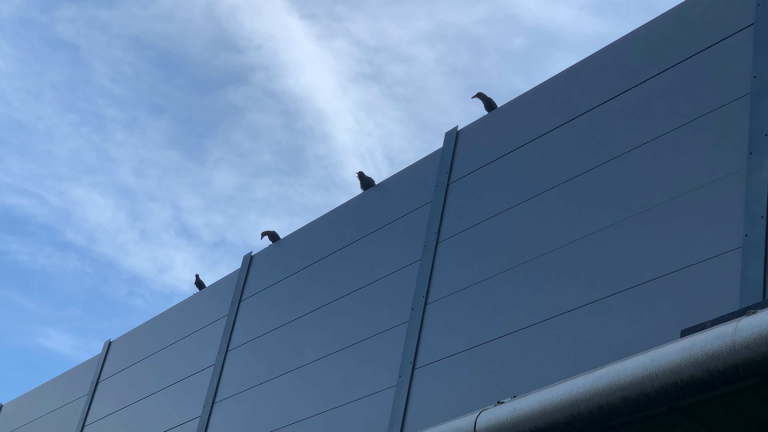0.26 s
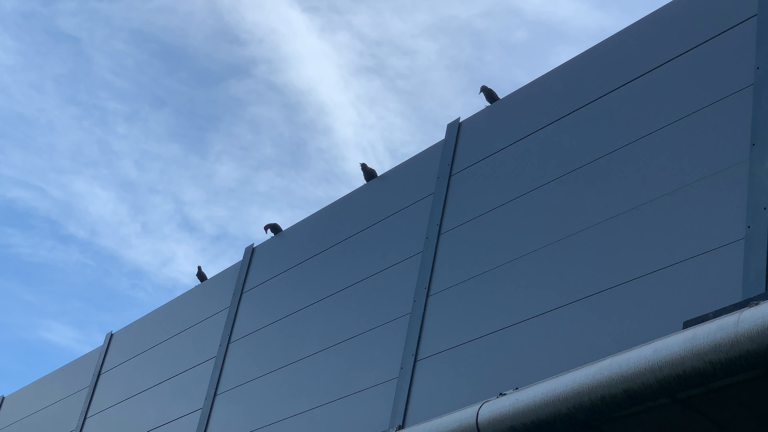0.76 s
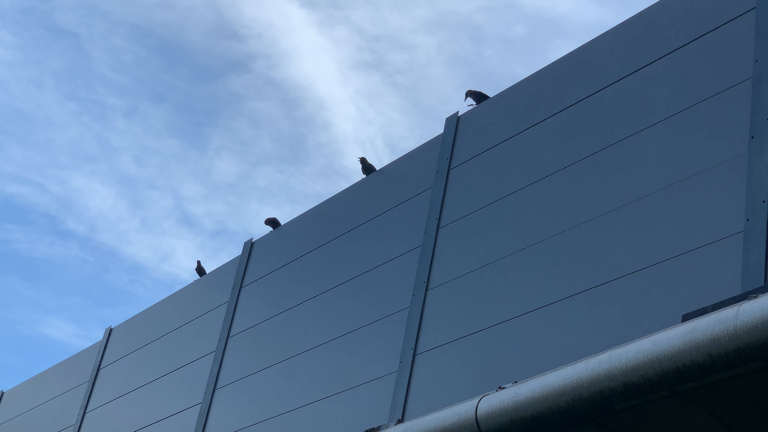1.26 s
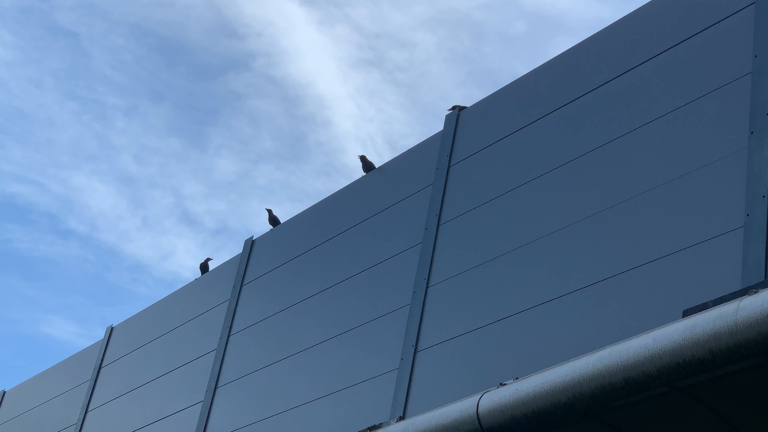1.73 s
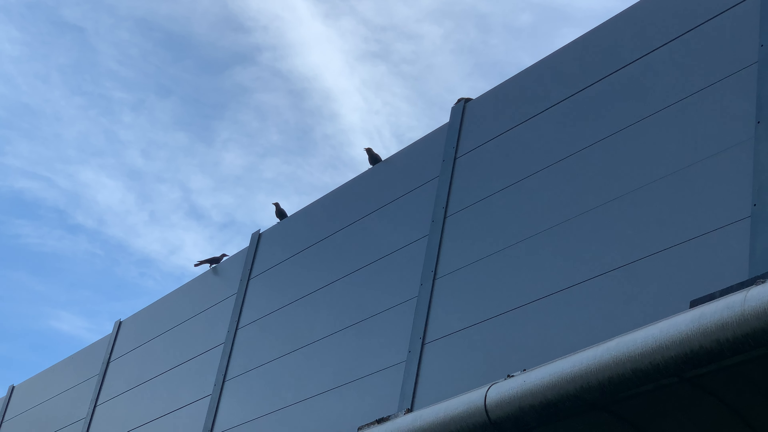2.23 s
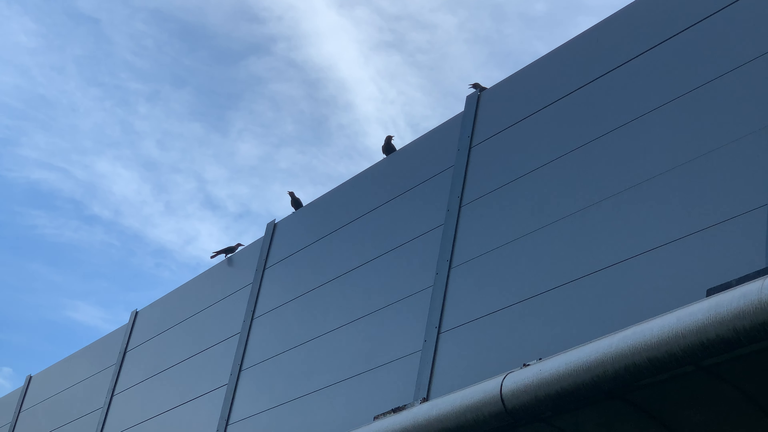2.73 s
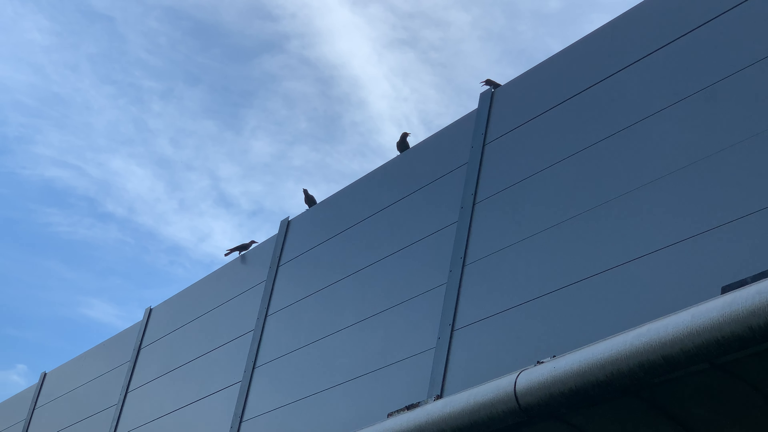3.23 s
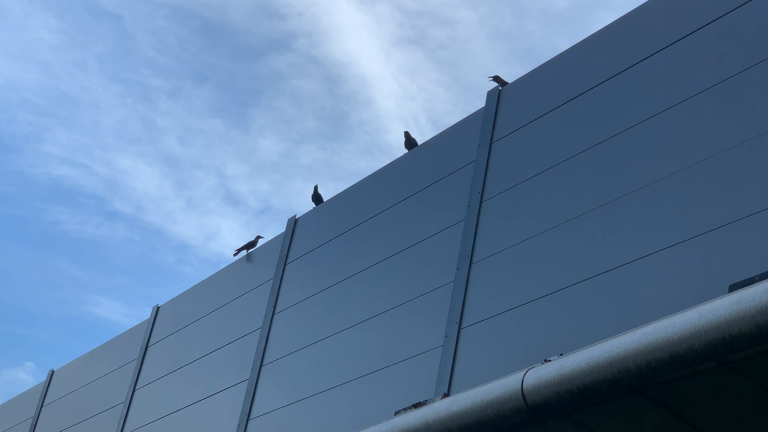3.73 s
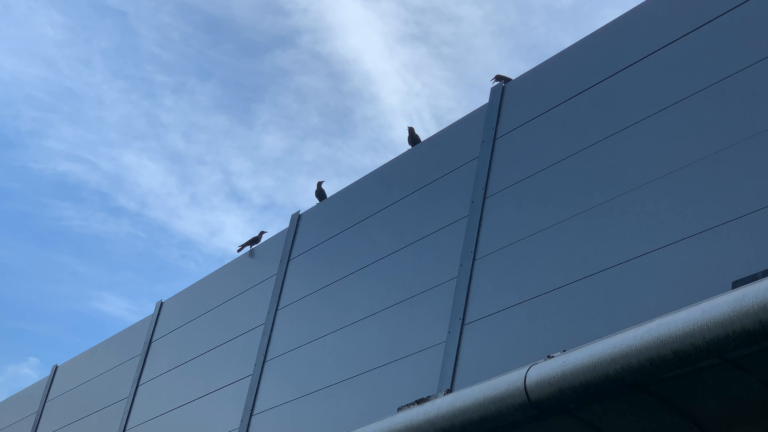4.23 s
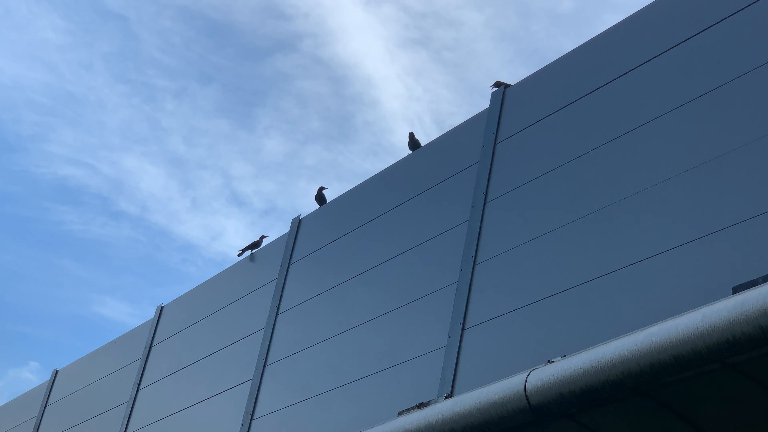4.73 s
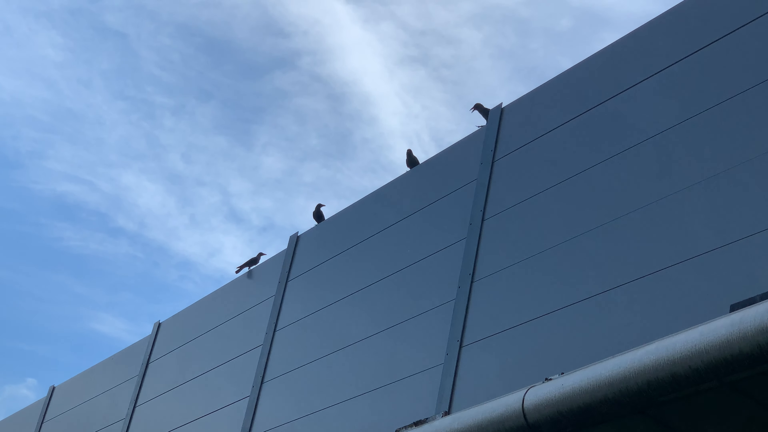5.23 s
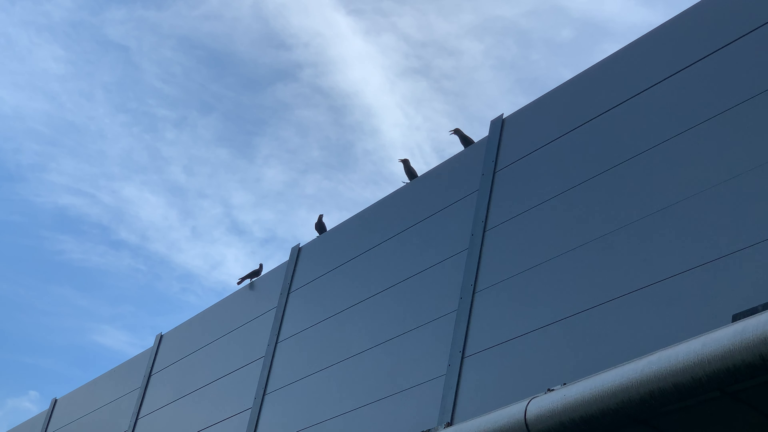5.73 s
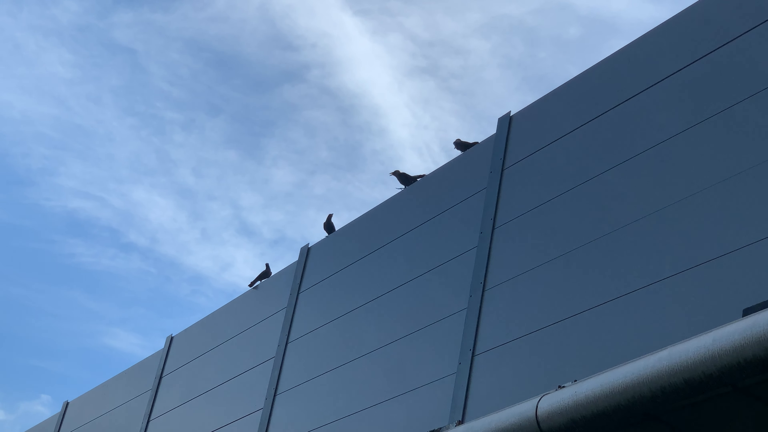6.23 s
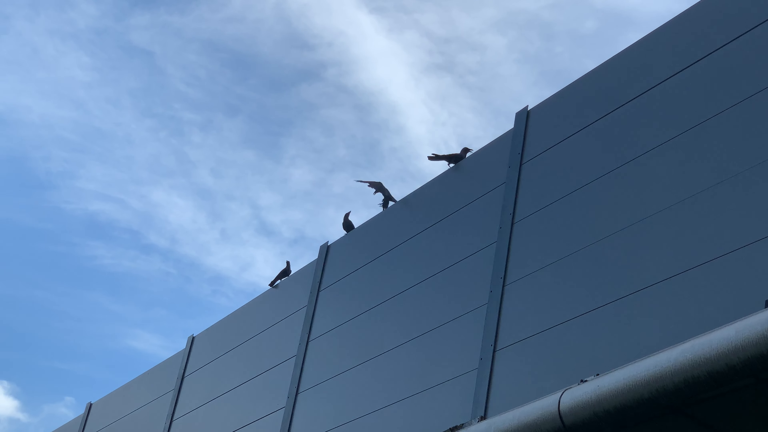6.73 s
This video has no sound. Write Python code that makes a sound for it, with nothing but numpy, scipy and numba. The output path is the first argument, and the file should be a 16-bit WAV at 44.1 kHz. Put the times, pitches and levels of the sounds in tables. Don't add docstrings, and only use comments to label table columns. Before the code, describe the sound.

Outdoors beside an elevated road, crows on a tall metal wall caw hoarsely some metres away. Two spaced calls come first, then a quick run of four alternating weak and loud. After a pause filled with wind buffeting, one more caw and a short faint one follow. Traffic rumble, hum and soft tyre hiss continue underneath, heard through a handheld phone microphone.

```python
import sys
import numpy as np
from scipy import signal
from scipy.fft import rfft, irfft
from scipy.io import wavfile
from scipy.ndimage import uniform_filter1d
from numba import njit

SR = 44100
rng = np.random.default_rng(int(sys.argv[2]) if len(sys.argv) > 2 else 0)


def gain_from_decibels(decibels):
    exponent = np.asarray(decibels, float) / 20
    return 10 ** exponent


def master_out(mix):
    frames = np.transpose(np.atleast_2d(mix))
    ceiling = np.clip(frames, -1, 1)
    pcm = np.round(ceiling * 32767).astype(np.int16)
    wavfile.write(sys.argv[1], SR, pcm)


N = 307377


def unit(x):
    return x / np.sqrt(np.mean(x ** 2) + 1e-18)


def over_hz(table, hz):
    f, v = np.transpose(table)
    return np.interp(np.log(hz + 1), np.log(f + 1), v)


@njit
def svf(x, hz, width):
    y, b, l = np.empty(len(x)), 0., 0.
    for i in range(len(x)):
        g, k = np.tan(np.pi * hz[i] / SR), width / hz[i]
        v = (b + g * (x[i] - l)) / (1 + g * (g + k))
        b, l, y[i] = 2 * v - b, l + 2 * g * v, k * v
    return y


def band(x, hz, width_hz):
    return svf(x, np.zeros(len(x)) + hz, 1. * width_hz)


def walk(rate_hz, size=N):
    k = int(SR / rate_hz)
    steps = np.repeat(rng.standard_normal(size // k + 1), k)
    return 1.299 * uniform_filter1d(uniform_filter1d(steps, k), k)[:size]


def crows():
    # start_s, length_s, level_db, top_flutter_hz, fall_s
    caws = [
        (0.106, .455, -34.5, 86.69, .23),
        (0.949, 0.4407, -36, 85.12, 0.179),
        (2.481, 0.381, -38.5, 79.38, 0.2764),
        (2.718, .39, -30.5, 83.38, 0.17),
        (3.089, .39, -39, 79.1, .26),
        (3.54, .53, -32, 83.65, .3),
        (5.489, 0.401, -35, 85.43, 0.314),
        (6.474, .295, -42.5, 77.53, .17),
    ]
    # open_pipe_hz, valve_db, low_lines_db, rasp_db, top_air_db
    timbres = [(1943.5, -15.5, -12.5, -9, -2), (1915, -2.5, -11.5, -9, -2), (1922, -6.5, -12.5, -12, -2),
               (1917, -22, -18, -15.5, 0), (1909, 1.5, -11.5, -12.5, -2),
               (1898.6, -15.5, -15.5, -12.5, 2.37), (1963.4, -2.5, -15, -15.5, -2),
               (1789, -13.5, -11.5, -13.5, -1)]
    # valve_cycles_per_flutter, second_slap_share, second_slap_turns, rise_s, left_minus_right_db
    voices = [(13, -0.48, .5, 0.12, 1.42), (13, 0.54, .5, 0.14, 1), (13, 0.57, .45, .12, 0.5),
              (13, -0.52, .5, 0.064, 1.5), (13, 0.53, .45, 0.11, 0.37), (13, -0.45, .5, .11, 0.9),
              (12, 0.54, 0.34, .125, -0.1), (12, 0.66, .5, .14, 1.35)]
    roughness = [(1.4, .55), (1.5, .5), (1.7, .75), (1.3, .45), (1.9, .7), (1.7, .4), (1.5, .8), (2.3, .7)]
    # hz, left_lead_rad
    port_lead = [(300, .2), (1100, 0.99), (2000, 0.46), (4400, 1.344), (6300, 2.418), (8500, 1.055),
                 (10000, 1.57), (14000, 1.42)]
    # hz, left_minus_right_db
    crow_lean = [(60, 0.5), (110, -0.5), (200, -0.5), (380, 1.5), (700, -3.5), (1290, -2), (2380, -5.5),
                 (4400, -7), (8120, -2), (15000, 1)]
    direct = np.zeros((2, N))
    for call, timbre, voice, rough in zip(caws, timbres, voices, roughness):
        start, sound = caw(call, timbre, voice, *rough)
        i = np.arange(len(sound))
        fade = np.minimum(1, np.minimum(i, i[::-1]) / (.022 * SR))
        pan = gain_from_decibels(np.array([[.5], [-.5]]) * voice[-1])
        direct[:, start:start + len(sound)] += sound * fade * pan
    hz = np.fft.rfftfreq(N, 1 / SR)
    lean = gain_from_decibels(np.outer([.5, -.5], over_hz(crow_lean, hz)))
    lag = np.exp(1j * np.outer([0, -1], over_hz(port_lead, hz)))
    ports = irfft(rfft(direct) * lean * lag, N)
    return ports + wall_echo(direct)


def caw(call, timbre, voice, rough, sinks):
    # valve_multiple, level_db
    valve_lines = [(1, 3), (2, -3), (4, -21)]
    # hz, width_hz, level_db
    rasp_bands = [(2846, 1430, -6.5), (4240, 632, -1.47), (8680, 3390, 6), (10716, 480, 3.5)]
    start_s, length_s, top_db, top_hz, fall_s = call
    open_hz, valve_db, low_db, rasp_db, air_db = timbre
    cycles, second, place, rise_s, _ = voice
    fourth_db = 8 + .7 * valve_db
    valve_db = min(valve_db, -4.5)
    t = np.arange(int(length_s * SR)) / SR
    size = len(t)

    sag = effort_sag(t, length_s, rise_s, fall_s)
    fade_db = 15 * (sag / .3) ** 1.543
    level_db = top_db - fade_db + 1.2832 * walk(14.4, size)
    rasp_db = rasp_db + 0.428 * fade_db * (t < rise_s)
    flutter_hz = top_hz * (1 - sag)
    pipe_hz = open_hz * (1 - sinks * sag + .014 * walk(23.1, size))
    valve_hz = cycles * flutter_hz

    slack = np.clip((1 - flutter_hz / flutter_hz.max() - .02) / 0.1227, 0, 1)
    jitter = .003 * rough * (1 + 3 * slack) * walk(120, size)
    turn = np.cumsum(flutter_hz * (1 + jitter)) / SR
    throb = gain_from_decibels(2.87 * np.cos(2 * np.pi * turn) + 0.944 * np.cos(4 * np.pi * turn + 3.83))
    first, octave, fourth = (gain_from_decibels(db) * np.sin(2 * np.pi * k * cycles * turn) * throb for k, db in valve_lines)
    first = first + gain_from_decibels(-3) * np.sin(2 * np.pi * (cycles - 2) * turn)
    breath = throb * rng.standard_normal(size)

    slaps = slap_clicks(turn, 0, rough) + np.clip(second, -.45, .45) * slap_clicks(turn, place, rough)
    slaps = sweep(unit(band(slaps, 2082, 1220)))
    drive = slaps + gain_from_decibels(valve_db) * octave + rough * gain_from_decibels(-11.5 + 10 * slack) * breath
    drive /= np.sqrt(uniform_filter1d(band(drive, 1227, 900) ** 2, size=1600) + 1e-9)

    pair = svf(drive, .985 * pipe_hz, 178.0) - gain_from_decibels(-2.5) * svf(drive, 1.08 * pipe_hz, 203.0)
    pipe = unit(svf(svf(pair, 1.02 * pipe_hz, 657.0), 1.02 * pipe_hz, 820.0))
    throat = unit(svf(svf(drive, 1.576 * valve_hz, 400.), 1.707 * valve_hz, 400.))
    throat *= rough * gain_from_decibels(-21 + (20 - 2 * rough) * slack)
    pipe_top = signal.butter(6, 2313, fs=SR, output="sos")
    ring = signal.sosfilt(pipe_top, pipe + throat)

    low_ring = unit(svf(svf(drive, valve_hz, 410.0), valve_hz, 454.0))
    low = gain_from_decibels(low_db) * (gain_from_decibels(-8 * slack) * first + gain_from_decibels(3.0) * low_ring)

    rasp = sum(gain_from_decibels(db) * unit(band(band(breath, hz, w), hz, 1.035 * w)) for hz, w, db in rasp_bands)
    rasp += gain_from_decibels(air_db - 0.5) * unit(band(band(breath, 13000, 2500), 15300, 4000))
    rasp += gain_from_decibels(0.72 * air_db + 4.5) * unit(band(band(breath, 6743, 1470), 6055, 1600))

    beak_hz = 4 * valve_hz.max()
    beak_drive = gain_from_decibels(fourth_db + 3 * walk(40, size)) * fourth / throb ** .2 + gain_from_decibels(-17.5) * drive
    upper = band(band(beak_drive, beak_hz, 450), beak_hz, 600)
    return int(start_s * SR), gain_from_decibels(level_db) * (ring + low + upper + gain_from_decibels(rasp_db - 4.5) * rasp)


def effort_sag(t, length_s, rise_s, fall_s):
    rising = np.clip(1 - t / rise_s, 0, 1)
    falling = np.clip(1 - (length_s - t) / fall_s, 0, 1)
    return .32 * rising ** 1.7 + .3 * falling ** 2.4


def slap_clicks(turn, place, rough):
    clicks = np.diff(np.floor(turn + place), prepend=0.)
    return clicks * gain_from_decibels(1.4 * rough * walk(121.56, len(turn)))


def sweep(x):
    top_hz, bottom_hz, longest_ms = 2250, 1650, 13
    hz = np.fft.rfftfreq(len(x), 1 / SR)
    late_s = longest_ms / 1000 * np.clip((top_hz - hz) / (top_hz - bottom_hz), 0, 1)
    return irfft(rfft(x) * np.exp(-2j * np.pi * np.cumsum(late_s) * hz[1]), len(x))


def wall_echo(direct):
    level_db, t60_s = -18.5, 1.5
    t = np.arange(int(1.2 * SR)) / SR
    tail = rng.standard_normal((2, len(t))) * gain_from_decibels(-60 * t / t60_s) * np.clip((t - .015) / .04, 0, 1)
    tail = np.array([band(band(c, 2600, 1460), 1830, 3500) for c in tail])
    tail /= np.sqrt((tail ** 2).sum(axis=1, keepdims=True))
    return gain_from_decibels(level_db) * signal.fftconvolve(direct, tail, axes=1)[:, :N]


def wind():
    # start_s, peak_db, pitch_hz
    buffets = [(0.279, -21, 81.7), (1.639, -28.5, 64), (3.929, -17.5, 101), (3.99, -25, 60),
               (4.11, -20.5, 80), (4.249, -19, 110.4), (4.322, -17.5, 72.9), (4.411, -13.5, 111.2),
               (4.44, -18, 78.1), (4.658, -17.5, 128), (4.709, -19.5, 66.4), (4.759, -20, 75.7),
               (4.921, -22, 94), (5.039, -22, 137), (5.268, -16.5, 119.2), (5.379, -19.5, 144.2),
               (5.661, -20, 159), (5.767, -18, 111), (5.9, -26, 113), (5.981, -19.5, 66.4)]
    return gain_from_decibels(-3) * knocks(buffets, cycles=.4, glide=.8, spread_db=2.5)


def knocks(events, cycles, glide, spread_db):
    out = np.zeros((2, N + SR))
    for (start_s, db, hz), lean in zip(events, rng.standard_normal((len(events), 1))):
        t = np.arange(int(6 * cycles / hz * SR)) / SR
        x = t * hz / cycles
        swing = np.sin(2 * np.pi * hz * t * (1 + glide * np.exp(-x))) * x * np.exp(1 - x)
        start = int(start_s * SR)
        out[:, start:start + len(t)] += gain_from_decibels(db + spread_db * lean * np.array([[1], [-1]])) * swing
    return out[:, :N]


def road():
    # time_s, load_db
    rumble = [(0.0, -41), (0.29, -37.5), (0.78, -42), (1.28, -39.5), (1.53, -37.5), (1.98, -42.5),
              (2.74, -41), (3.53, -41), (4.5, -34), (6.37, -38), (6.85, -39.5), (6.97, -37)]
    # hz, db_per_hz
    bass_table = [(12, -37.5), (20, -24.5), (54, 4.5), (124, -0.5), (252, -12.5), (317, -13), (420, -18.5),
                  (550, -46.5), (920, -120)]
    # hz, db_per_hz
    tyre_table = [(250, -31), (420, -2.5), (665, -3), (900, -2), (1400, -6), (1900, -5), (3140, -11),
                  (3500, -14), (4600, -13), (5300, -22.5), (7500, -27), (8900, -26.5), (9600, -18.5),
                  (10600, -36), (13000, -62)]
    # hz, width_hz, level_db
    hum = [(60, 16.06, -42), (137, 13.45, -47), (194.9, 13.4, -59.5), (267.47, 13.6, -56),
           (9923, 900, -62.5)]
    # hz, left_minus_right_db
    road_lean = [(60, 1), (110, -2), (200, -1.5), (380, -1.5), (700, 2), (1290, 0.5), (2380, 0.5),
                 (4400, -1.5), (8120, -2.5), (15000, 8.5)]
    s, db = np.transpose(rumble)
    load_db = np.interp(np.arange(N) / SR, s, db - np.median(db)) - 0.0955 * walk(11)
    bass = traffic(bass_table, -37.5, range(-12, -1), 0.564 * load_db)
    mid, side = bass + traffic(tyre_table, -48, range(-4, 8), 1.17 * walk(0.3804))
    tone_hz = 315.28 + 0.7577 * walk(2.853)
    mid = mid + gain_from_decibels(-46 + 0.78 * walk(3.3)) * np.sin(2 * np.pi * np.cumsum(tone_hz) / SR)
    for centre_hz, width_hz, level_db in hum:
        ring = [unit(band(band(rng.standard_normal(N), centre_hz, width_hz), centre_hz, width_hz))
                for _ in range(2)]
        mid = mid + gain_from_decibels(level_db) * ring[0]
        side = side + gain_from_decibels(level_db - 11.5) * ring[1]
    lean_db = np.outer([.5, -.5], over_hz(road_lean, np.fft.rfftfreq(N, 1 / SR)))
    return irfft(rfft([mid + side, mid - side]) * gain_from_decibels(lean_db), N)


def traffic(table, level_db, steps, load_db):
    # hz, side_minus_mid_db
    road_side = [(60, -16), (110, -11), (200, -6.5), (380, 6), (700, 5.5), (1290, 1), (2380, -0.5),
                 (4400, 1.5), (8120, -0.5), (15000, 0)]
    hz = np.fft.rfftfreq(N, 1 / SR)
    colour_db = over_hz(table, hz) + np.outer([0, 1], over_hz(road_side, hz))
    noise = rfft(rng.standard_normal((2, N))) * gain_from_decibels(colour_db)
    out = 0
    for step in steps:
        share = np.clip(1 - abs(2 * np.log2(hz / 1000 + 1e-9) - step), 0, 1)
        out = out + gain_from_decibels(load_db + 1.575 * walk(6)) * irfft(noise * share, N)
    return out * gain_from_decibels(level_db) / np.std(irfft(noise[0], N))


def ticks():
    # start_s, peak_db, centre_hz, ring_ms
    scratches = [(0.9438, -68.5, 13600, 8), (1.9796, -59, 13030, 8), (2.4694, -72.5, 14000, 8),
                 (3.4206, -59.5, 12800, 8), (4.4453, -91.5, 13900, 8), (4.851, -52.5, 13860, 7.2),
                 (5.3896, -62.5, 12900, 8), (5.4494, -70, 14100, 8), (5.8855, -43, 13640, 5.5),
                 (5.9758, -73.5, 14200, 8), (6.0576, -62.5, 13300, 8), (6.1094, -57.5, 13800, 8),
                 (6.2223, -54.5, 13330, 8), (6.2776, -64, 13400, 8), (6.4251, -54, 13500, 8),
                 (6.8438, -64.5, 13700, 8), (6.9139, -55, 13200, 8), (6.9296, -47.5, 13270, 6.7),
                 (6.9444, -56, 13300, 8)]
    out = np.zeros((2, N + SR))
    t = np.arange(SR // 10) / SR
    for start_s, db, hz, ring_ms in scratches:
        scratch = [unit(band(c, hz, 2600)) for c in rng.standard_normal((2, len(t)))]
        start = int(start_s * SR)
        out[:, start:start + len(t)] += gain_from_decibels(db + 6.0) * np.exp(-1000 * t / ring_ms) * scratch
    return out[:, :N]


def cheeps():
    # start_s, peak_db, pitch_hz
    chirps = [
        (4.3093, -69, 3900),
        (4.5794, -54.5, 3170),
        (5.9185, -43, 3210),
        (6.231, -46, 5920),
    ]
    return gain_from_decibels(-7) * knocks(chirps, cycles=20, glide=.05, spread_db=1.5)


def scene():
    return crows() + wind() + road() + ticks() + cheeps()


def band_limit(x):
    return signal.sosfilt(signal.butter(12, 15770, fs=SR, output="sos"), x)


def record(dry):
    # hz, gain_db
    mic_response = [(10300, 0.5), (10900, -13.5), (11400, -24.5), (12100, -38.5), (12600, -0.5),
                    (14600, -11), (15300, -19.5)]
    heard = irfft(rfft(dry) * gain_from_decibels(over_hz(mic_response, np.fft.rfftfreq(N, 1 / SR))), N)
    return band_limit(heard)


dry = scene()
out = record(dry)
master_out(out)
```